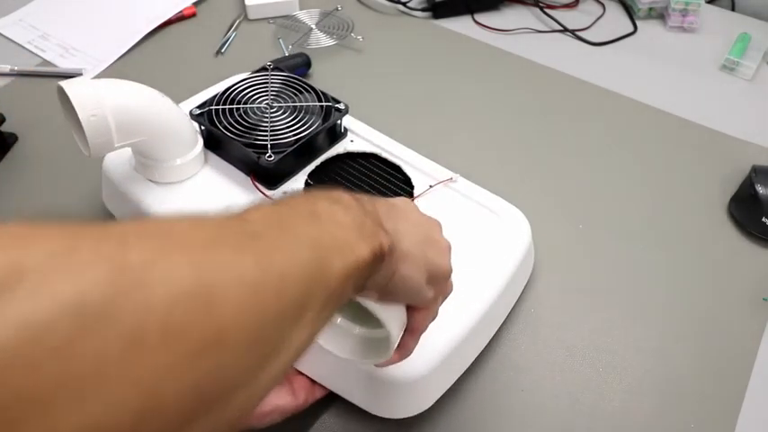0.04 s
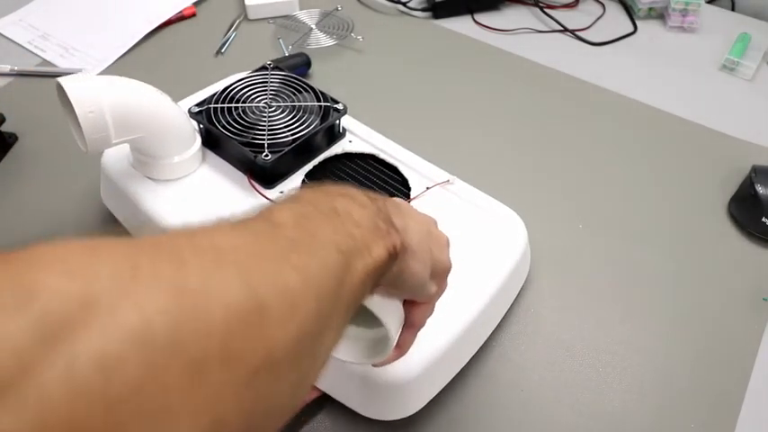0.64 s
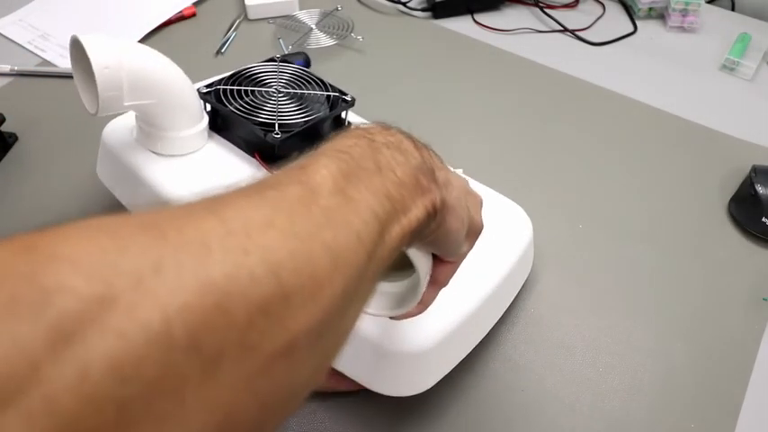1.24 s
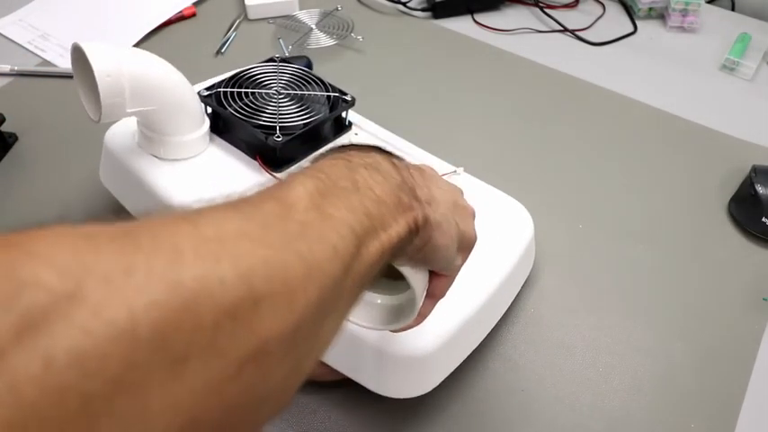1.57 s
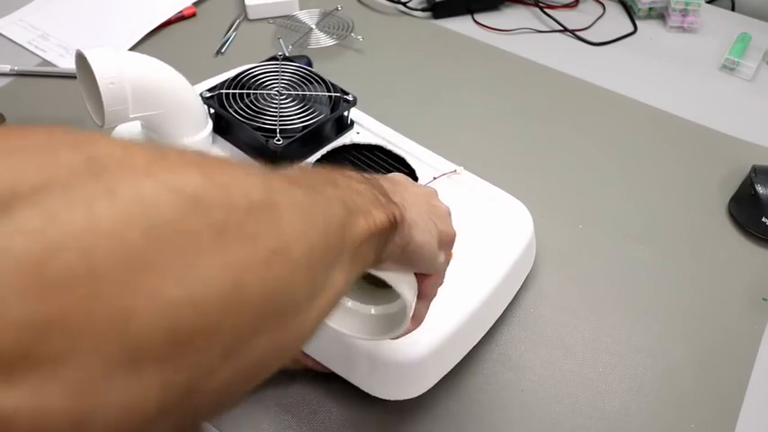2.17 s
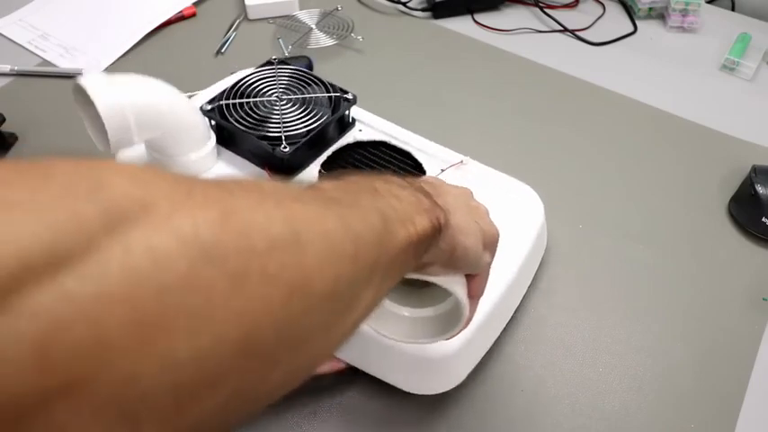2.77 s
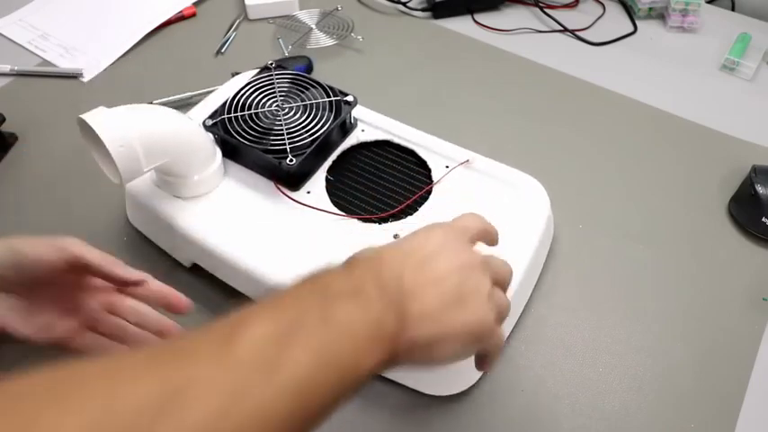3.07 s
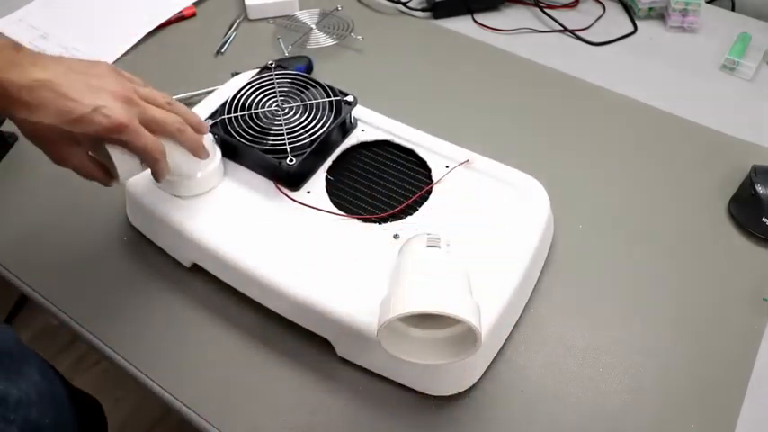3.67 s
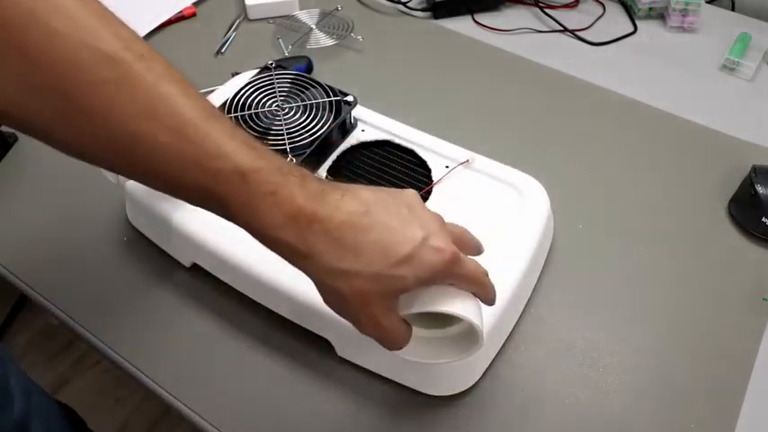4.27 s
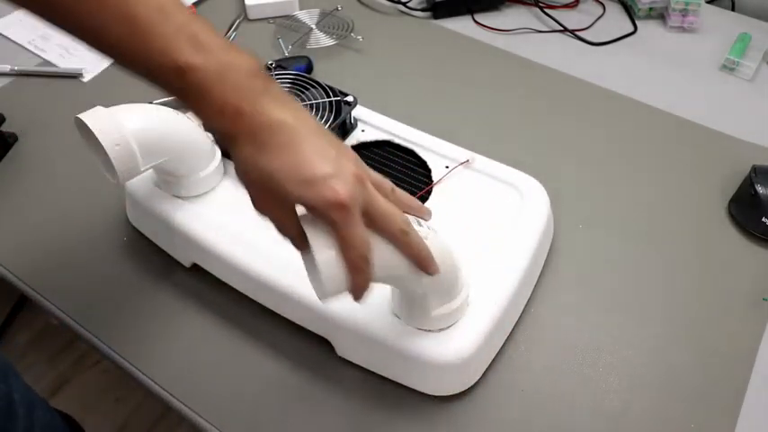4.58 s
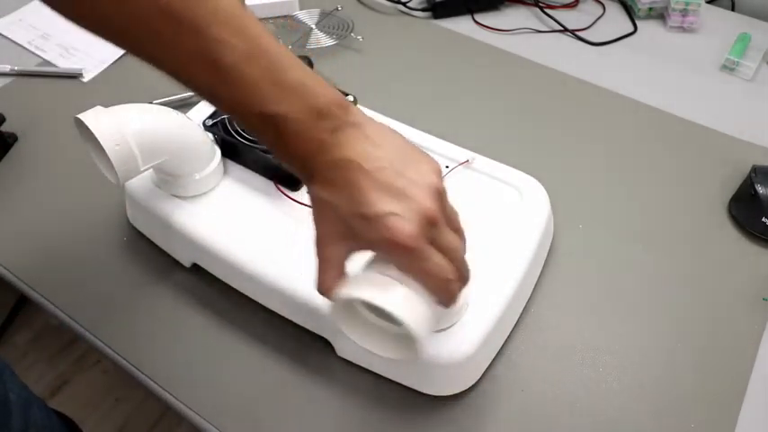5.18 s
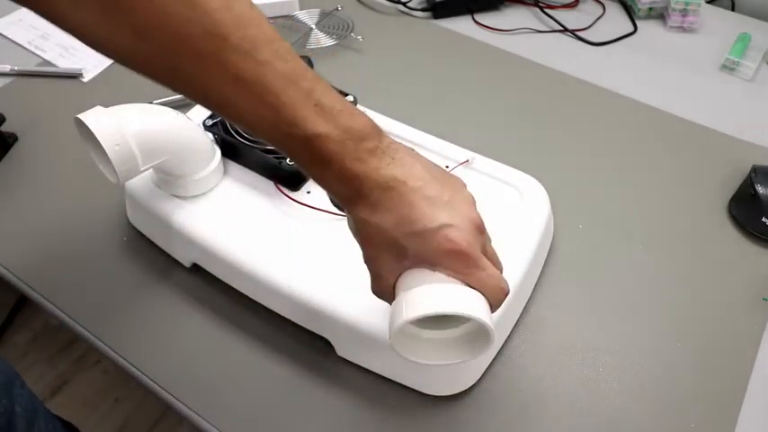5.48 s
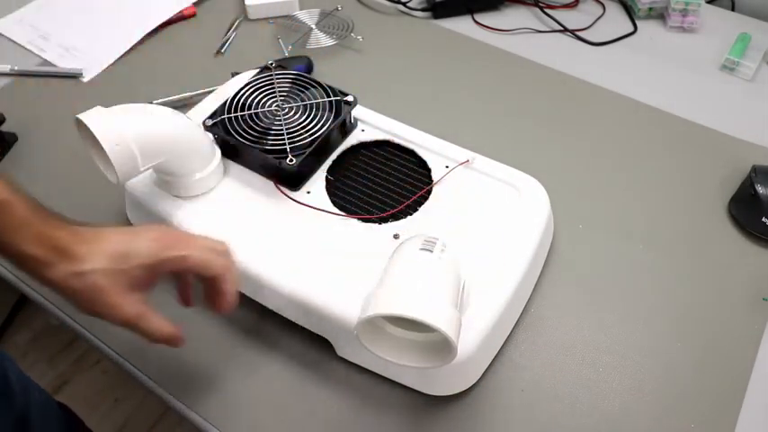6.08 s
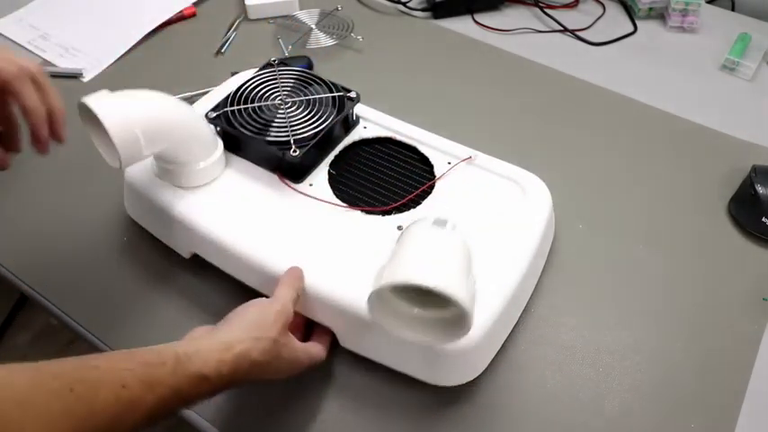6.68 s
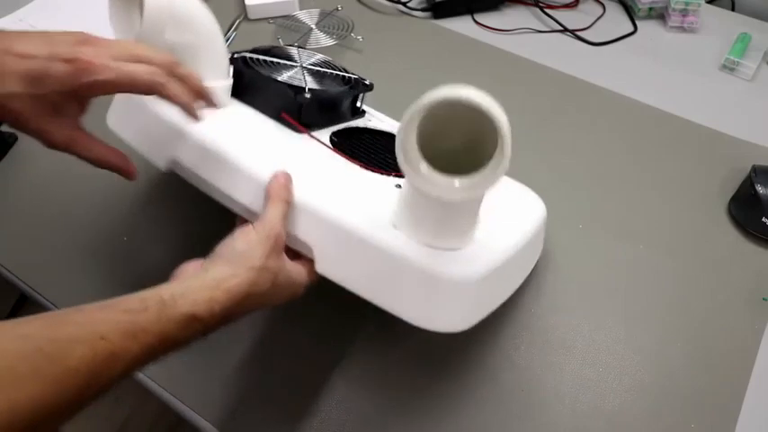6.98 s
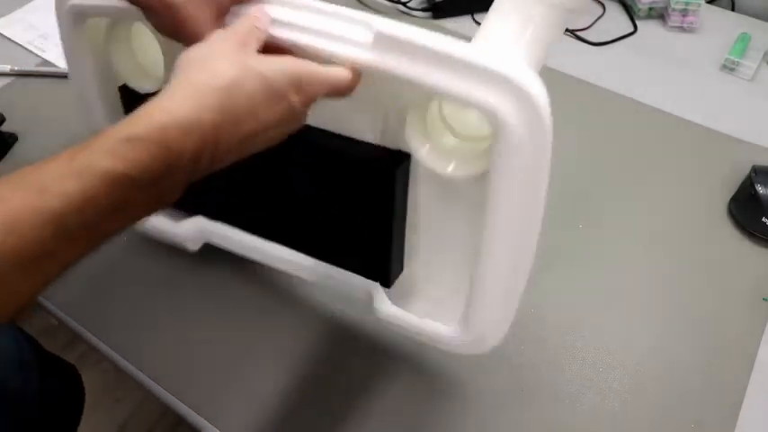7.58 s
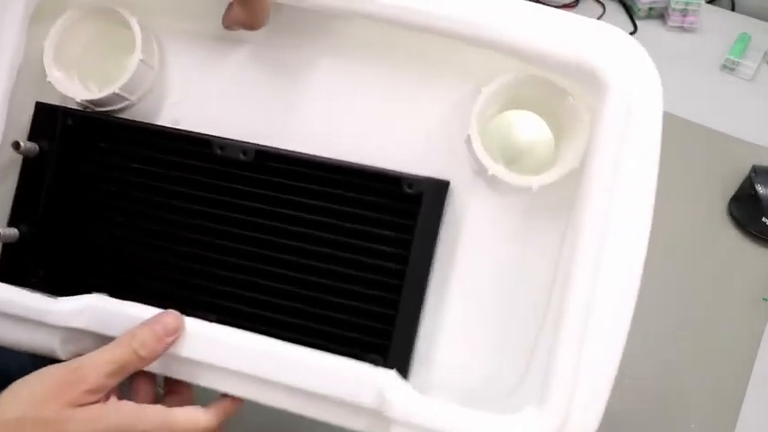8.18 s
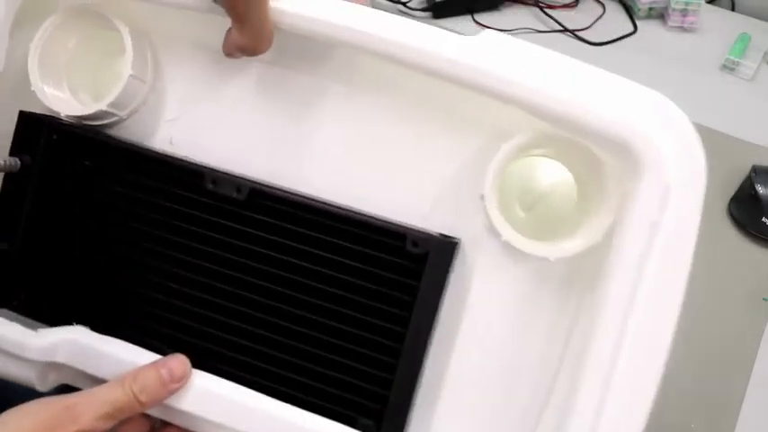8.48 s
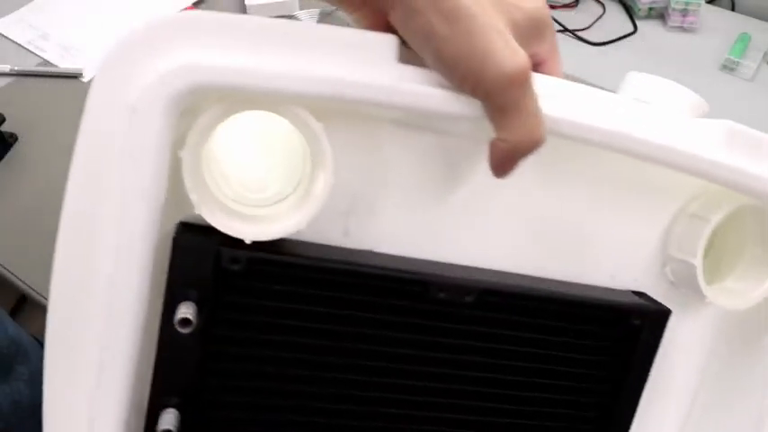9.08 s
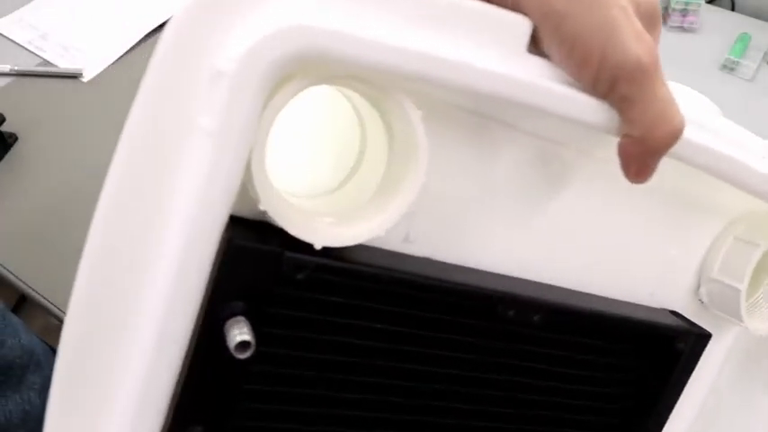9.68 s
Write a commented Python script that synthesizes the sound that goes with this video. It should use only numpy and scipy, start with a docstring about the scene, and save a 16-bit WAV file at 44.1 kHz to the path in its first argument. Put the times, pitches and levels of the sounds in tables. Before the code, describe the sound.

Plastic pipe fittings knock, scrape and creak against a hollow plastic lid, which is then dragged over a workbench and handled.

```python
"""A small workshop: on the bench a plastic pipe elbow is pushed and twisted into a hollow cooler lid.
Stick-slip friction makes it groan, scrape and tick, and impacts excite the damped modes of lid and elbow.
A loose hollow piece clonks nearby; then the lid is tipped up, drags over the bench and slides through
the hands. The room reverberates briefly, over still air and a faint mains hum."""
import sys
import numpy as np
from scipy import signal
from scipy.fft import rfft, irfft, next_fast_len
from scipy.io import wavfile
from scipy.ndimage import uniform_filter1d, map_coordinates

SR = 44100
rng = np.random.default_rng(int(sys.argv[2]) if len(sys.argv) > 2 else 0)


def digitize_waveform(pressure):
    """Quantize a signal to 16-bit integers and store it at the path in sys.argv[1].

    Rows of a 2-D input are taken as channels; values are limited to [-1, 1].
    """
    field = np.atleast_2d(pressure).T
    bounded = np.clip(field, -1, 1)
    quanta = np.round(bounded * 32767).astype(np.int16)
    wavfile.write(sys.argv[1], SR, quanta)


N = 433944
SCENE_T = np.arange(N) / SR
T = np.arange(int(.7 * SR)) / SR  # time since a blow, t/s

# modes of the lid's panels, of the whole lid flexing and of the elbow: f/Hz, relative level/dB, T60/s
PANEL_MODES = [(280.9, 6, 0.28), (350.3, -2, 0.45), (430.5, 5, 0.34), (549, 3, 0.26), (607, 4, 0.38),
               (645, -2.5, 0.27), (741, -1, 0.15), (790, 4.5, 0.3), (1058, 9, 0.14), (1196, 12.5, 0.13),
               (1350, 7, 0.076), (1470, 4, 0.2), (1710, -10, 0.155), (2090, 3, 0.22), (2325, 4, 0.2),
               (2690, -13, 0.11)]
FLEX_MODES = [(67.4, -12, 0.56), (111.6, -2.5, 0.47), (160.5, 3, 0.1)]
ELBOW_MODES = [(1036, -2.5, 0.39), (1148, -5, 0.3), (1287, -2, 0.41)]
# clack, snap and tick, the bands above a knock's body: low f/Hz, high f/Hz, T60/s, room send/dB
UPPER_BANDS = [(560, 1680, 0.056, -0.5), (1680, 3710, 0.054, -3), (5460, 10960, 0.058, -1)]
# offset of clack, snap and tick from the slope of the force spectrum: level/dB
UPPER_OFFSETS = [-1, -2.5, 4.5]
# blows on the lid: t/s, body f/Hz, body level/dB, hardness/octaves above the corner frequency,
# flex/dB re body, slide before catching t/s, panel ring/dB (low where the hand damps it)
KNOCKS = [(0.002, 746, -46, 0.36, -15, 0.0028, -2), (0.122, 380, -45, 0.55, -12.5, 0.00037, -3.5),
          (0.72, 337, -62.5, 1.4, -13, 0.00054, -0.5), (1.059, 420, -58, 2, -20, 0.0037, -2),
          (1.078, 526, -50, 2, -13, 0.0011, 0.5), (1.089, 503, -59, 3, -10, 0.0022, -10),
          (1.207, 560, -50, 2.5, -16, 0.0032, 0), (1.324, 375, -39, 0.36, -13.5, 0.0002, -2),
          (1.353, 477, -45.5, 0.5, -14, .001, 2), (1.377, 433, -47.5, -1, -12, 0.00087, -8),
          (1.460, 390, -46, 4.4, -6, 0.0003, -0.5), (1.462, 1500, -40.5, 2, -34, 0.00043, -2),
          (1.573, 600, -44, 1, -26, 0.00087, 1), (1.576, 1430, -49, 5, -34, .0012, -4),
          (1.628, 467, -45.5, 1, -6.5, 0.00078, -11), (1.645, 527, -49.5, 3.5, -34, 0.00044, -3),
          (1.648, 1370, -41.5, 3, -36, 0.00096, -3), (1.657, 1250, -43.5, 0.5, -34, .001, -4),
          (2.263, 380, -59, -0.5, -10, 0.0019, -2), (2.283, 423, -48.5, -0.2, -6.5, 0.001, -3.5),
          (2.33, 366, -48, -1, -2.5, 0.00036, -2), (2.33, 1260, -48, 0.5, -24, 0.00035, -6),
          (2.561, 408, -69, 3.5, 2, .0005, -3), (2.643, 410, -55, 0.5, -8, 0.0015, 4),
          (2.774, 584, -36, 0.47, -10, 0.0017, -1), (2.825, 666, -31.5, 1.5, -14, 0.00025, -4),
          (2.825, 382, -31, -0.5, -29, 0.0003, 0), (2.851, 360, -46, 1.2, 0, .001, 2),
          (3.011, 530, -46, 2.63, -23, 0.00045, -1), (3.038, 453, -34.5, 0.1, -30, 0.00086, -1),
          (3.073, 624, -32, 1.5, -31, 0.00015, 0.5), (3.079, 390, -29.5, -2, -26, 0.00042, 1.5),
          (3.808, 365, -65.5, 1.8, -26, 0.001, 0), (4.402, 554, -62, 2, -2.5, .001, -0.5),
          (4.758, 1320, -52.5, 3, -24, 0.0003, 3), (4.759, 438, -60, 2, -19, 0.00091, -5),
          (4.898, 443, -66, 4, -14, 0.0026, 0.5), (5.551, 396, -64, -4.5, -6, 0.0012, -7),
          (5.679, 348, -70.5, 2, -5, .002, -3), (5.779, 358, -65.5, 1.8, -9, 0.0055, 0),
          (5.844, 1270, -71, -7, -13, .003, 0), (6.673, 573, -43, 2.5, -23, 0.00029, -1),
          (6.673, 430, -32.5, -0.32, -37, 0.00045, -2), (6.966, 460, -42.5, 3, -23, 0.00042, -3),
          (6.967, 1040, -47, 3, -30, 0.00091, 1), (7.029, 850, -50, 2.5, -27, 0.0021, -7),
          (7.173, 600, -50.5, 2, -2, 0.00088, -6), (8.399, 1300, -65.5, 0.8, -22, .0005, 8.5),
          (9.472, 1170, -59, 1.4, -11, 0.0023, 0)]


def knocks(corner_hz=419, rolloff_db_per_octave=10, stiff_db_per_octave=11.5):
    """Impact excitation: the panels ring, the whole lid flexes, and sharp contacts ring the elbow."""
    out = np.zeros((2, N))
    centres = np.array([np.sqrt(low * high) for low, high, _, _ in UPPER_BANDS])
    for s, pitch_hz, body_db, hardness, flex_db, slide_s, free_db in KNOCKS:
        # a harder contact is shorter, so its force reaches higher before it falls away
        octaves_beyond = np.maximum(np.log2(centres / corner_hz) - hardness, 0)
        upper_db = body_db - rolloff_db_per_octave * octaves_beyond + UPPER_OFFSETS
        # a stiff, high-pitched spot passes little to the modes below it
        loss_db = lambda hz: stiff_db_per_octave * np.log2(pitch_hz / np.maximum(hz, corner_hz)).clip(0)
        body_band = pitch_hz / 1.62, pitch_hz * 1.15
        direct = amp(body_db) * contact(*body_band, t60=0.051, push=1.55, slide_s=slide_s)
        to_room = amp(body_db - 4) * pulse(*body_band)
        for db, (low, high, t60, room_db) in zip(upper_db - loss_db(centres), UPPER_BANDS):
            direct += amp(db) * contact(low, high, t60, push=0.29, slide_s=slide_s)
            to_room += amp(db + room_db) * pulse(low, high)
        force = list(zip([corner_hz, *centres], [body_db, *upper_db]))
        driven = [(hz, db + along(force, hz) - loss_db(hz), t60) for hz, db, t60 in PANEL_MODES]
        panels = amp(free_db - 10) * ring(driven, detune=0.0177)  # the hand's load shifts each mode
        elbow = amp(upper_db[-1] - 1) * ring(ELBOW_MODES)  # follows the tick's level
        flex = amp(body_db + flex_db + 1) * ring(FLEX_MODES) * onset(0.0083)
        add(out, s, direct + room(to_room) + (panels + elbow) * onset(slide_s) + flex)
    return out


# sticking plastic letting go: t/s, low f/Hz, high f/Hz, level/dB
TICKS = [(0.852, 2600, 13000, -68), (1.079, 2600, 13000, -59), (1.153, 4000, 14000, -63),
         (1.172, 1300, 4000, -71), (1.287, 2600, 14000, -61), (1.297, 1300, 4200, -63),
         (1.323, 3200, 6040, -57), (1.34, 2600, 13000, -62), (1.46, 2600, 14700, -42),
         (1.462, 1400, 2430, -44), (1.576, 1380, 1700, -45), (1.645, 2600, 4520, -50.5),
         (2.363, 3300, 9500, -68), (2.826, 1850, 2700, -37.5), (3.039, 1300, 2880, -51),
         (4.758, 2600, 12600, -43.5), (4.903, 2400, 3400, -67), (6.674, 2600, 10800, -55),
         (6.968, 2200, 3030, -44), (8.397, 2600, 13000, -71)]


def ticks(room_db=-4):
    """Release of static friction: a thin tick from an edge, a lower crack from the pipe wall."""
    out = np.zeros((2, N))
    for s, low_hz, high_hz, db in TICKS:
        direct = contact(low_hz, high_hz, t60=0.04, push=0.71, slide_s=0.00018)
        add(out, s, amp(db) * (direct + amp(room_db) * room(pulse(low_hz, high_hz))))
    return out


# spectra of the three kinds of rubbing: f/Hz, relative spectral level/dB
GROAN_SPECTRUM = [(40, -22), (100, -1), (150, 1), (200, -1), (280, -1), (390, 9), (550, -2), (750, 2),
                  (1500, -49)]
SCRAPE_SPECTRUM = [(350, -49), (600, -3.5), (830, -6), (980, 1.5), (1400, 1.5), (1700, -5), (2000, -2.5),
                   (2500, -5.5), (3000, -8.5), (4300, -14), (7000, -91)]
HISS_SPECTRUM = [(1500, -15), (2600, -2.5), (4200, -9.5), (5400, -5.5), (7500, -1), (10000, -3.5),
                 (13000, -8), (15800, -14.5)]


def rubbing(gain_db=-1.83, room_db=-6):
    """Sliding friction: heavy pressure makes the lid groan, lighter strokes scrape, and skin hisses."""
    groan = friction(GROAN_SPECTRUM, slips_per_s=110, grain_db=-11.5, judder_db=2)
    groan = moving_contact(groan, depth_db=1.5)
    scrape = friction(SCRAPE_SPECTRUM, slips_per_s=170, grain_db=-6, judder_db=0.9)
    scrape = lid_cavity(moving_contact(scrape, depth_db=3.5))
    hiss = friction(HISS_SPECTRUM, slips_per_s=140, grain_db=-14, judder_db=1)
    gains = amp(gain_db) * np.sqrt(hand_power() + drag_power())
    direct = sum(gain * texture for gain, texture in zip(gains, [groan, scrape, hiss]))
    return direct + amp(room_db) * room(direct)


# strokes of plastic on plastic and skin: start t/s, length/s, rise/s, relative scrape level/dB,
# groan/dB re scrape, hiss/dB re scrape
STROKES = [(-0.04, 0.038, 0.036, -52.5, 4, -8), (0.67, 0.31, 0.26, -58.5, -5, -2),
           (1.108, 0.084, 0.083, -54.5, -5, 0.5), (1.237, 0.073, 0.038, -50.5, -1.5, -8),
           (1.36, 0.11, 0.034, -53, -1, -11.5), (1.516, 0.19, 0.044, -53.5, -6, -6),
           (1.854, 0.12, 0.081, -58, -3.5, -5), (2.34, 0.1, 0.036, -66, 2.5, -13),
           (2.691, 0.26, 0.18, -52, -1, 2.5), (2.997, 0.14, 0.049, -53, 12.5, -12.5),
           (3.696, 0.21, 0.087, -72, -1, -0.5), (4.33, 0.046, .04, -85, 8, 10.5),
           (4.448, 0.39, 0.18, -67.5, 1, 1.5), (4.856, 0.013, .02, -64.5, -1, 2),
           (5.147, 0.15, 0.035, -73.5, -2, 7), (5.263, 0.18, 0.043, -67.5, 1.5, 0),
           (5.484, 0.072, 0.039, -83.5, -2, 13), (5.61, 0.26, 0.049, -84.5, 9.5, 11),
           (6.483, 0.29, 0.14, -70.5, 1.5, -5), (6.752, 0.15, 0.052, -58.5, 0.5, -3.5),
           (7.875, 0.2, 0.042, -70.5, -23, -7), (8.252, 0.11, 0.039, -72, -26, 4),
           (8.396, 0.047, 0.02, -59.5, -30, 0.5), (8.5, 0.062, 0.05, -61.5, -24, -13),
           (8.564, 0.3, 0.22, -58, -25, 3), (8.866, 0.11, 0.036, -63, -18, 7.5),
           (8.99, 0.16, 0.039, -62, -13, -7), (9.215, 0.11, 0.088, -68.5, -9, -22),
           (9.493, 0.15, 0.072, -65, -26, -11)]
# hands resting on the plastic keep up a faint rub: start t/s, end t/s
GRIPS = [(0, 3.2), (3.6, 5.95), (6.6, 9.84)]
# groan, scrape and hiss of that rub: relative level/dB
GRIP_LEVELS = [-76.5, -80.5, -81.5]
SETTLE_S = 0.037  # a grip or the drag takes hold


def hand_power():
    """Incoherent addition: strokes and grips sum in power, one row each for groan, scrape and hiss."""
    moves = [(stroke(start, length, rise), db + np.array([groan_db, 0, hiss_db]))
             for start, length, rise, db, groan_db, hiss_db in STROKES]
    moves += [(stroke(start, end - start, SETTLE_S), GRIP_LEVELS) for start, end in GRIPS]
    envelopes, levels = zip(*moves)
    return amp(levels).T ** 2 @ np.array(envelopes) ** 2


# the tipped lid dragging over the bench: t/s, then relative level/dB of groan, scrape and hiss
DRAG = [(7.0, -58, -46, -48), (7.02, -52, -52, -59), (7.17, -50, -49.5, -60.5), (7.26, -52, -52.5, -56.5),
        (7.396, -52, -53, -60.5), (7.446, -54.5, -52.5, -53.5), (7.524, -63, -56.5, -61),
        (7.695, -54.5, -53.5, -55), (7.82, -98, -76, -87)]


def drag_power():
    """Sliding friction on the bench: the power of groan, scrape and hiss as the lid is dragged."""
    s, *levels = np.transpose(DRAG)
    gains = np.array([amp(np.interp(SCENE_T, s, db)) for db in levels])
    return (gains * stroke(s[0], s[-1] - s[0], SETTLE_S)) ** 2


# resonance of the hollow under the tipping lid: t/s, f/Hz, peak gain/dB
LID_CAVITY = [(7.0, 1020, 0), (7.1, 1080, 2), (7.22, 1140, -7), (7.36, 1010, 6), (7.46, 910, 13),
              (7.6, 900, -1), (8.3, 1200, 0), (8.54, 1290, 10.5), (8.8, 1340, -1), (9.05, 1220, -1),
              (9.6, 1240, 3)]


def lid_cavity(x, width_hz=85):
    """Cavity resonance: the hollow under the lid shifts in pitch as it is tipped, and colours x."""
    hz, t, spectra = signal.stft(x, SR, nperseg=1024)
    s, centre_hz, peak_db = np.transpose(LID_CAVITY)
    peak = resonance(hz[:, None], np.interp(t, s, centre_hz), width_hz)
    gain = amp(np.interp(t, s, peak_db, left=0, right=0) * peak)
    return signal.istft(spectra * gain, SR, nperseg=1024)[1][:, :N]


# hollow resonances of the elbow under a rub: f/Hz, bandwidth/Hz, peak gain/dB
ELBOW_HOLLOWS = [(955, 70, 6), (1130, 80, 3), (1260, 70, 3), (1390, 70, 3), (1620, 140, 3),
                 (1950, 160, 3.5), (2500, 200, 2), (3950, 200, 3), (4500, 260, 5.5)]


def friction(spectrum, slips_per_s, grain_db, judder_db, spread_db=4):
    """Stick-slip noise: tiny random slips on a smooth rush, filtered by the plastic's hollows; rms 1."""
    slips = (rng.random(N) < slips_per_s / SR) * rng.choice([-1, 1], N)
    strengths = amp(spread_db * np.clip(rng.standard_normal(N), -2, 2))
    source = (diffuse(N) + amp(grain_db) * unit(slips * strengths)) * amp(judder_db * wobble(45))
    hollow_db = lambda hz: sum(db * resonance(hz, centre, width) for centre, width, db in ELBOW_HOLLOWS)
    return unit(filtered(source, lambda hz: amp(along(spectrum, hz) + hollow_db(hz))))


def moving_contact(x, depth_db):
    """Modal coupling depends on position: resonances come and go as the contact travels; rms 1."""
    spectra = signal.stft(x, nperseg=1024)[2]
    coupling = uniform_filter1d(rng.standard_normal(spectra.shape[1:]), size=3, axis=0)  # over frequency
    coupling = uniform_filter1d(coupling, size=9, axis=1)  # over time
    return unit(signal.istft(spectra * amp(depth_db * unit(coupling)), nperseg=1024)[1][:, :N])


# modes of the loose piece: f/Hz, relative level/dB, T60/s
PIECE_MODES = [(355, 7, 0.38), (468, 3.5, 0.34), (735, -8, 0.56), (1017, -13.5, 0.34), (1245, 0, 0.23),
               (1282, -6, 0.49), (1545, -10.5, 0.31), (1690, -10, .45), (1885, -15, 0.38), (2073, -16, 0.3),
               (2180, -21, 0.42), (2681, -21, 0.3), (2840, -6, 0.076)]
# its rim touching down: t/s, relative level/dB
RIM_TOUCHES = [(6.138, -46), (6.144, -43), (6.148, -44), (6.154, -42)]


def loose_piece(ring_db=-44, touch_db=-2, click_db=-9, room_db=-3, rock_db=4.6):
    """Free vibration: a hollow piece rattles down on its rim and rings on in its own modes."""
    out = np.zeros((2, N))
    knock_hz, click_hz = (250, 2400), (3300, 11000)
    for s, db in RIM_TOUCHES:
        knock = contact(*knock_hz, t60=0.047, push=1, slide_s=0.00068)
        click = amp(click_db) * contact(*click_hz, t60=0.051, push=0.17, slide_s=0.0008)
        reverb = amp(room_db) * room(pulse(*knock_hz) + amp(click_db) * pulse(*click_hz))
        add(out, s, amp(db + touch_db) * (knock + click + reverb))
    # each mode flutters as the piece rocks to rest
    modes = sum((-1) ** k * ring([mode]) * amp(rock_db * wobble(66, count=len(T)))
                for k, mode in enumerate(PIECE_MODES))
    add(out, RIM_TOUCHES[1][0], amp(ring_db) * modes * onset(0.00091))
    return out


# soft bumps of the lid against the bench: t/s, level/dB
BUMPS = [(.01, -44), (1.325, -44), (2.335, -50), (3.06, -35), (4.43, -60), (6.772, -41.5)]


def bumps(hz=42):
    """A heavily damped oscillator: the lid's weight gives the bench a low, dead push."""
    out = np.zeros((2, N))
    for s, db in BUMPS:
        add(out, s, amp(db) * fade(t60=0.11) * np.sin(2 * np.pi * hz * T) * onset(0.024))
    return out


# spectrum of dry skin on plastic: f/Hz, relative spectral level/dB
RASP_SPECTRUM = [(700, -40), (1300, 0), (1800, 3), (2600, -2), (3400, 0.5), (4500, -7), (6000, -7),
                 (12000, -16)]
# fingertip strokes: start t/s, length/s, rise/s, level/dB
RASPS = [(1.16, 0.042, 0.022, -63), (1.27, 0.022, .02, -59), (4.495, 0.023, .012, -67.5),
         (4.672, 0.1, 0.093, -65), (5.163, 0.091, 0.028, -68.5), (7.114, 0.037, .04, -58.5),
         (7.24, 0.16, 0.034, -61), (7.623, 0.057, 0.042, -57.5), (8.4, 0.037, 0.032, -67),
         (8.64, 0.16, 0.13, -60.5), (9.534, 0.061, 0.053, -80)]


def rasps(room_db=-6):
    """Stick-slip of skin: dry fingertips catch and let go in a fine, gritty chatter."""
    grit = friction(RASP_SPECTRUM, slips_per_s=220, grain_db=-3.5, judder_db=0.8)
    envelope = sum(amp(db) * stroke(start, length, rise) for start, length, rise, db in RASPS)
    direct = moving_contact(grit, depth_db=2.2) * envelope
    return direct + amp(room_db) * room(direct)


# reverberation time of the workshop: f/Hz, T60/s
ROOM_DECAY = [(100, 0.14), (260, 0.34), (700, 0.46), (1840, 0.48), (4850, 0.46), (12800, 0.33)]


def room(x, build_s=0.0032):
    """Reverberation: convolution with decaying noise, drawn anew for every spot that sounds."""
    hz, t, spectra = signal.stft(diffuse(len(T)), SR, nperseg=256)
    t60 = along(ROOM_DECAY, hz)[:, None]
    tail = signal.istft(spectra * fade(t60, t) / np.sqrt(t60), SR, nperseg=256)[1][:, :len(T)]
    response = unit(tail * onset(build_s) ** 2) / np.sqrt(len(T))
    return signal.fftconvolve(np.atleast_2d(x)[:1], response, axes=1)[:, :x.shape[-1]]


# spectrum of the still room: f/Hz, relative spectral level/dB
AIR_SPECTRUM = [(12, -55), (20, -29), (49, 0), (91, -9.5), (177, -11.5), (216, -12), (234, 0.5), (301, -13),
                (347, -8.5), (897, -20), (1610, -20), (3740, -26), (5380, -27.5), (12800, -27),
                (16000, -92)]
# partials of the mains hum: f/Hz, level/dB
HUM_PARTIALS = [(59.2, -89), (241, -88), (358, -88.5), (459, -101)]


def background(air_db=-69.5):
    """Ambient noise: the continuous spectrum of still air under the lines of an unsteady mains hum."""
    air = amp(air_db) * unit(filtered(diffuse(N), lambda hz: amp(along(AIR_SPECTRUM, hz))))
    hum = np.zeros(N)
    for hz, db in HUM_PARTIALS:
        peak = np.sqrt(2) * amp(db + 0.5 * wobble(0.21))
        hum += peak * np.sin(2 * np.pi * hz * SCENE_T + 1.16 * wobble(2.2))
    return air + hum


# likeness of left and right in the room: f/Hz, coherence (0 to 1)
COHERENCE = [(25, .8), (70, .95), (280, .97), (550, .78), (1100, .45), (2200, .1), (5000, 0)]


def diffuse(count):
    """A diffuse field: white stereo noise, coherent in the bass and unrelated in the treble."""
    angle = lambda hz: np.arccos(along(COHERENCE, hz)) / 2
    weights = lambda hz: np.array([np.cos(angle(hz)), np.sin(angle(hz))])
    mid, side = filtered(rng.standard_normal((2, count)), weights)
    return np.array([mid + side, mid - side])


def contact(low_hz, high_hz, t60, push, slide_s, clean_hit_s=0.0022):
    """An impact transient: one push and a crowd of damped wall modes; sliding blunts the push."""
    crowd = unit(band(diffuse(len(T)) * fade(t60) * onset(slide_s), low_hz, high_hz))
    sharpness = push * np.exp(-slide_s / clean_hit_s)
    return blow_energy(crowd + sharpness * unit(pulse(low_hz, high_hz, order=2)))


def pulse(low_hz, high_hz, order=3):
    """A band-limited impulse: one clean push with the energy of a contact."""
    return blow_energy(band(signal.unit_impulse(len(T)), low_hz, high_hz, order))


def ring(modes, scatter_db=1.5, detune=0):
    """Modal superposition: damped sinusoids, struck at new strengths by every blow."""
    return sum((-1) ** k * amp(db + scatter_db * rng.normal()) * fade(t60)
               * np.sin(2 * np.pi * hz * (1 + detune * rng.normal()) * T)
               for k, (hz, db, t60) in enumerate(modes))


def stroke(start, length, rise, t60=0.41):
    """Driven, then free vibration: an envelope that rises, holds and decays once the hand stops."""
    t = SCENE_T - start
    attack = np.sin(np.pi / 2 * np.clip(t / rise, 0, 1)) ** 2
    return attack * fade(t60, np.maximum(t - length, 0))


def resonance(hz, centre_hz, width_hz):
    """A Lorentzian peak of height 1."""
    return 1 / (1 + (2 * (hz - centre_hz) / width_hz) ** 2)


def fade(t60, t=T):
    """Exponential decay, 60 dB in t60 seconds."""
    return np.exp(-np.log(1000) * t / t60)


def onset(tau_s):
    """First-order rise after a blow."""
    return 1 - np.exp(-T / tau_s)


def amp(db):
    """Decibels to amplitude ratio."""
    return 10 ** (np.asarray(db) / 20)


def unit(x):
    """Scale to rms 1."""
    return x / np.sqrt(np.mean(x ** 2) + 1e-20)


def blow_energy(x):
    """Scale a blow to the energy of 15 ms at rms 1."""
    return unit(x) * np.sqrt(.015 * SR / len(T))


def along(points, hz):
    """Interpolate (f/Hz, value) points on a logarithmic frequency axis."""
    f, values = np.transpose(points)
    return np.interp(np.log(hz + 1), np.log(f), values)


def wobble(rate, count=N):
    """Smooth random modulation, rate knots a second."""
    return map_coordinates(rng.standard_normal(int(count * rate / SR) + 4), [np.arange(count) * rate / SR])


def filtered(x, response):
    """Zero-phase filtering by a function of frequency."""
    size = next_fast_len(x.shape[-1] + SR // 10)
    return irfft(rfft(x, size) * response(np.fft.rfftfreq(size, 1 / SR)), size)[..., :x.shape[-1]]


def band(x, low_hz, high_hz, order=3):
    """Causal band-pass."""
    return signal.sosfilt(signal.butter(order, [low_hz, high_hz], "band", fs=SR, output="sos"), x)


def add(track, s, sound):
    """Superpose a sound on the track at time s."""
    start = round(s * SR)
    track[:, start:start + sound.shape[-1]] += sound[..., :N - start]


# stereo balance of the handling: f/Hz, left minus right level/dB
BALANCE = [(250, 2), (550, 1.6), (1100, -1.4), (4000, -1.6), (12000, -2)]


def scene():
    """Superposition: the handling, its bass a little left and its treble right, over the background."""
    handling = knocks() + ticks() + loose_piece() + bumps() + rubbing() + rasps()
    return filtered(handling, lambda hz: amp(np.outer([.5, -.5], along(BALANCE, hz)))) + background()


def record(dry, top_hz=15750):
    """Band limiting: an ideal low-pass removes the highest treble."""
    return filtered(dry, lambda hz: hz < top_hz)


dry = scene()
out = record(dry)
digitize_waveform(out)
```